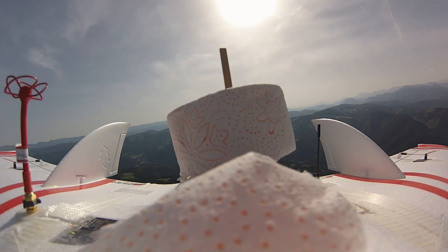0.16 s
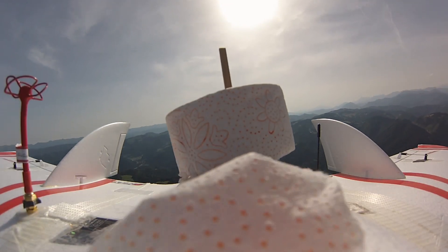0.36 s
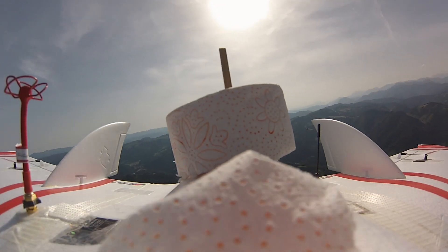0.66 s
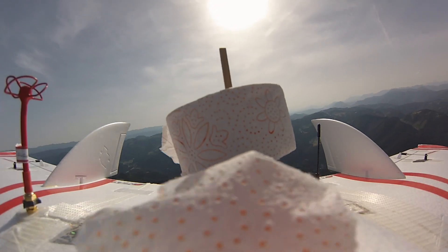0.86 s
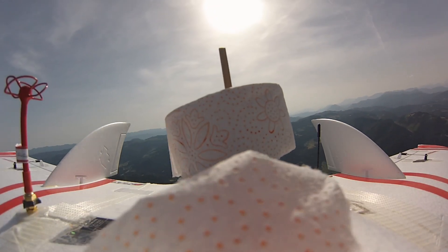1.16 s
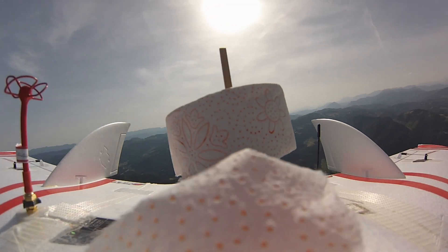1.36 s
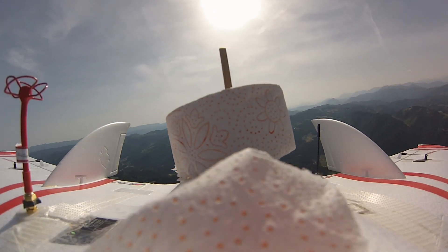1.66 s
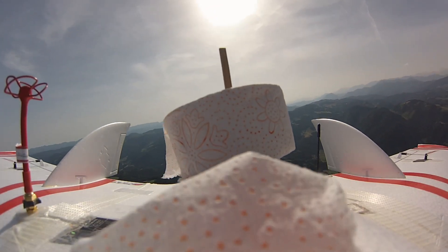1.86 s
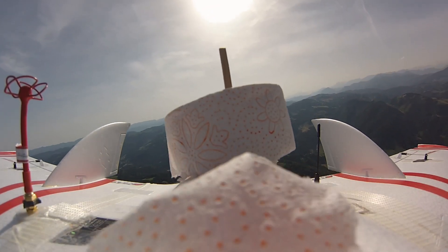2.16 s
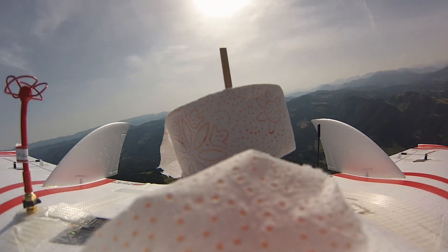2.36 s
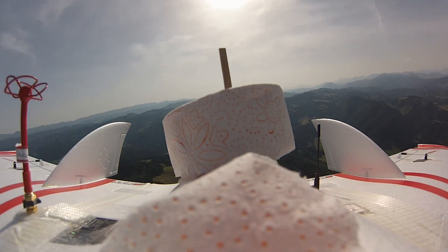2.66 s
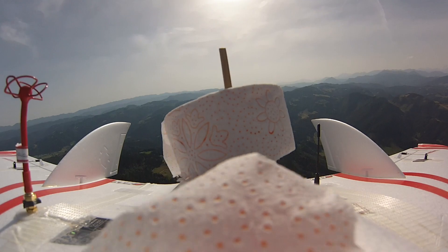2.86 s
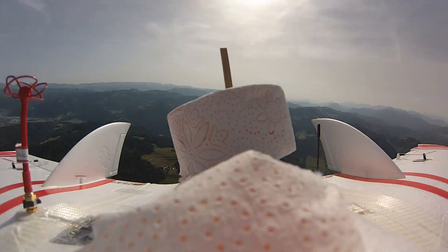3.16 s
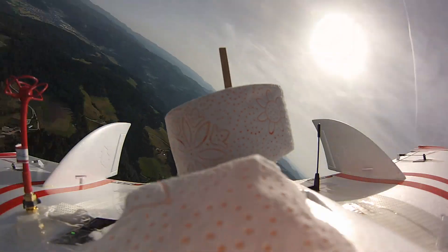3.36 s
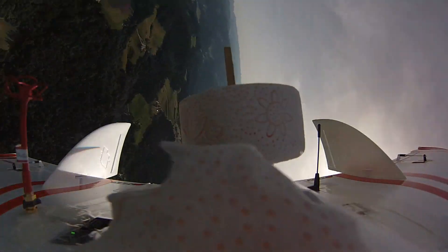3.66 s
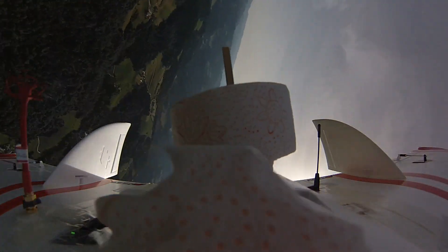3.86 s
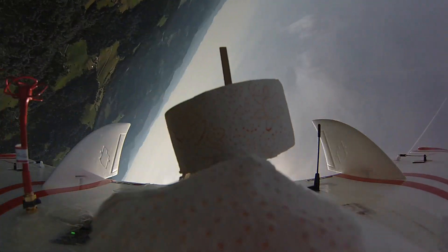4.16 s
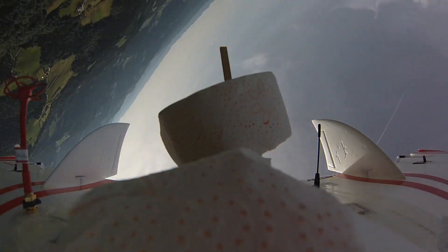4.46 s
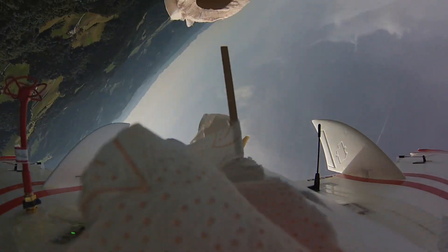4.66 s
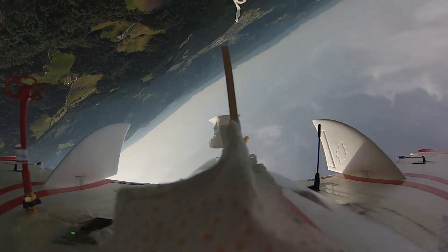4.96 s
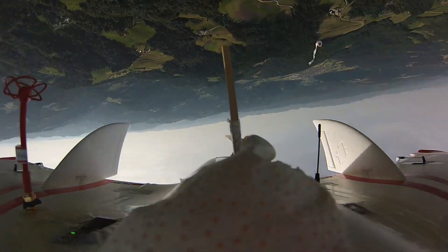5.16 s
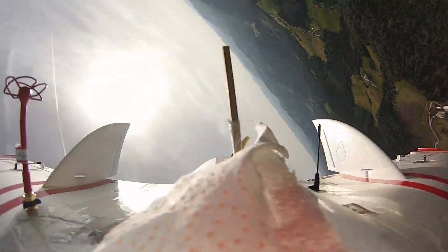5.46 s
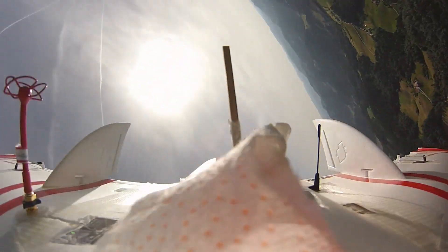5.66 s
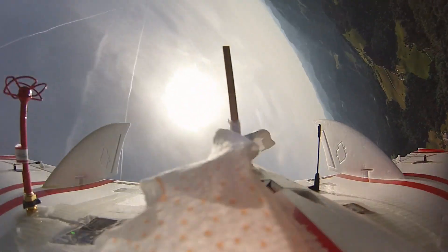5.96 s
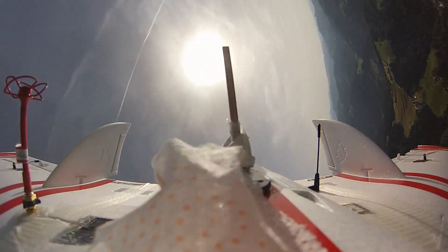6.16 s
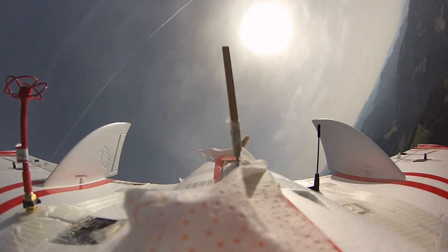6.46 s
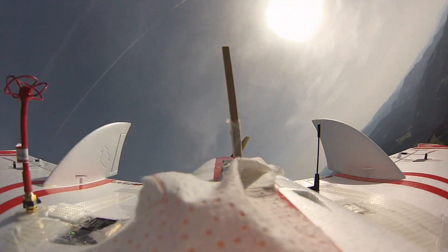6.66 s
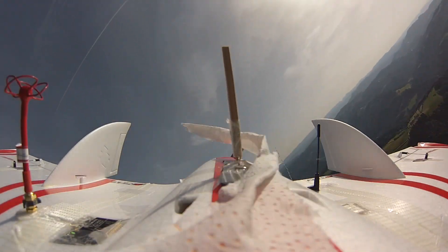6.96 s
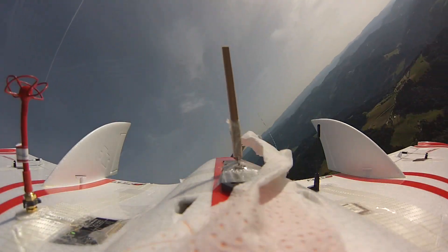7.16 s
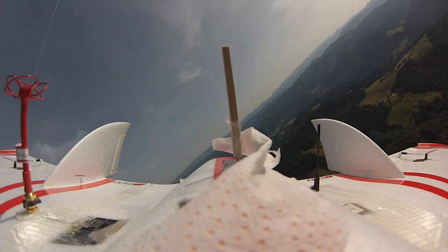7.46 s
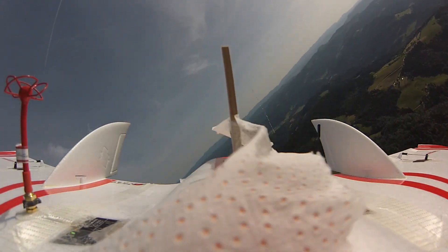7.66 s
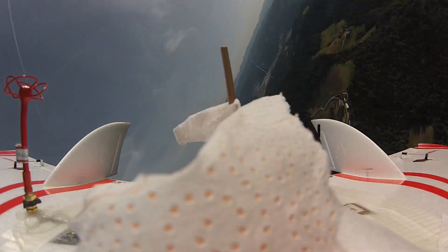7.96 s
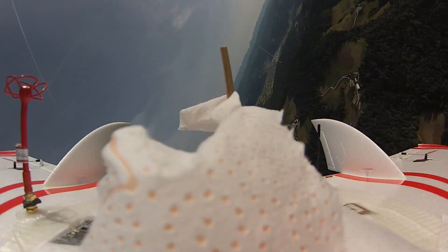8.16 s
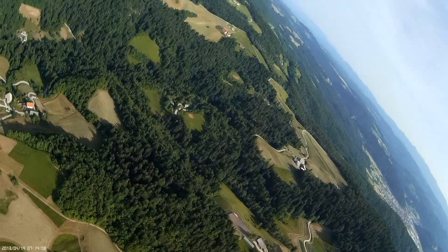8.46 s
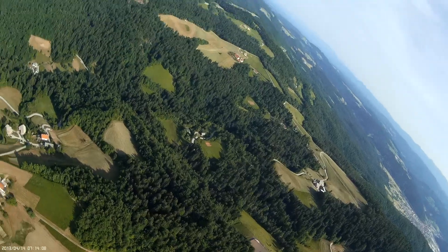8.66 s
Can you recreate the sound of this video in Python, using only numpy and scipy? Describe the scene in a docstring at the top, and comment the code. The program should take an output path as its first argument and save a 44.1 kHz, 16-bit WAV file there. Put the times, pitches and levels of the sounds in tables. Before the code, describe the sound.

A housed microphone rides the airframe outdoors: rumbling, gusty wind and a low two-blade motor drone. The drone turns coarser and louder under load, slides down and stops around the middle. A hollow knock and low wing shudders follow in thinner wind. Rushing air returns, paper rustles and crackles, then vibrates with a low reedy buzz. A hard cut brings a brighter, louder, saturated wind roar.

```python
"""On board a foam model plane in flight, microphone riding close on the airframe in a camera housing.
The two-blade propeller hums as a stack of shaft orders, is loaded in a roll and braked to a stop.
Bands of noise make the wind that buffets the housing; loose tissue paper buzzes as a wavering tone
and crackles as short noise bursts in the slipstream, and a paper roll knocks on the ringing fuselage.
Near the end the sound cuts to a second, bare microphone: broadband wind overloading its capsule."""
import sys
import numpy as np
from scipy import signal
from scipy.fft import rfft, irfft, next_fast_len
from scipy.io import wavfile
from scipy.ndimage import uniform_filter1d

SR = 44100
rng = np.random.default_rng(int(sys.argv[2]) if len(sys.argv) > 2 else 0)


def transcribe(u):
    """Save the signal u as a 16-bit wav file named by the first command-line argument.

    u: samples, shape (n,) or (channels, n), limited to [-1, 1]; the rate is SR.
    q: integer samples, one column per channel.
    """
    v = np.clip(np.atleast_2d(u).T, -1, 1)
    q = np.round(v * 32767).astype(np.int16)
    wavfile.write(sys.argv[1], SR, q)


N = 388521
TIME = np.arange(N) / SR
SIZE = next_fast_len(N)
BINS_HZ = np.maximum(np.arange(SIZE // 2 + 1) * SR / SIZE, 1)


def undb(db):
    """Amplitude of a level in dB."""
    return np.exp(np.asarray(db) * (np.log(10) / 20))


def unit(x):
    """Signal scaled to rms 1."""
    return x / np.sqrt(np.mean(x ** 2))


def columns(table):
    """Table columns as curves over time; the first column is the time in s."""
    s, *rest = np.transpose(table)
    return [np.interp(TIME, s, c) for c in rest]


def window(start_s, end_s, fade=0.018):
    """Gain 1 between two times, with short fades inside them."""
    return np.clip(np.minimum(TIME - start_s, end_s - TIME) / fade, 0, 1)


def walk(rate, size=N):
    """Random levels held about 1 / rate s and slewed twice; rms 1."""
    step = 16  # samples between coarse points
    hold = max(int(SR / step / rate), 2)
    held = np.repeat(rng.standard_normal(N // step // hold + 2), hold)
    coarse = uniform_filter1d(uniform_filter1d(held, hold), hold)
    return np.interp(np.arange(size), np.arange(len(coarse)) * step, unit(coarse))


def bell(offset, width):
    """Bell curve of height 1 that falls to 1/e at the width."""
    return np.exp(-(offset / width) ** 2)


def band(hz, width):
    """Gain of a bell-shaped band, for each frequency bin."""
    return bell(BINS_HZ - hz, width)


def read(spectrum, hz):
    """dB of a spectrum on a log-frequency axis."""
    f, db = np.transpose(spectrum)
    return np.interp(np.log(hz), np.log(f), db)


def noise(gain):
    """Steady noise of rms 1 with an amplitude gain for each frequency bin."""
    bins = rng.standard_normal(len(gain)) + 1j * rng.standard_normal(len(gain))
    return unit(irfft(gain * bins, SIZE)[:N])


def coloured(spectrum):
    """Steady noise of rms 1 with the given colour."""
    return noise(undb(read(spectrum, BINS_HZ)))


def tone(phase, db, waver_db=1.0, rate=25):
    """A sine of rms level about db whose strength wavers at random."""
    level_db = db + waver_db * walk(rate, size=len(phase))
    return np.sqrt(2) * undb(level_db) * np.sin(phase + rng.uniform(0, 2 * np.pi))


# mean shaft speed under power, then braking: time_s, shaft_hz
SHAFT_SPEED = [(0, 194), (1.25, 194), (1.33, 199.5), (1.4, 201), (1.55, 201.3), (1.63, 203.2),
               (1.75, 204.2), (1.9, 204.6), (2.09, 207.3), (2.3, 207.6), (3.0, 207.2), (3.19, 206.6),
               (3.24, 202.7), (3.42, 180.4), (3.49, 174.5), (3.66, 170.5), (3.7, 167.5), (3.76, 158),
               (3.85, 126.5), (4.0, 91.6), (4.046, 80.3), (4.08, 70), (4.11, 58.5), (4.17, 49)]
# flight state: time_s, state (0 climbing, 1 speeding up, 2 entering the roll, 3 blades loaded,
# 4 loaded hardest)
FLIGHT_STATE = [(1.27, 0), (1.6, 1), (3.17, 1), (3.32, 2), (3.45, 3), (3.66, 4)]
# motor levels, one row a flight state: imbalance_db, blade_tone_db, upper_orders_db
POWER_LEVELS = [(-28, -26.5, -50.5), (-30.5, -33.5, -53.5), (-27, -23, -57), (-27, -19.5, -49),
                (-26.5, -19, -46.5)]
# upper shaft orders relative to upper_orders_db, with half orders once the loaded blades flutter every
# second turn: multiple, then climbing_db, speeding_up_db, entering_roll_db, loaded_db, loaded_hardest_db
UPPER_ORDERS = [(3, 7, 1, 5, 0, 2), (3.5, -30, -30, -10, 1, -6), (4, 1, -3, 10, 6, 11),
                (4.5, -30, -30, 0, 6, 1), (5, 1, -3, 3, -4, 3), (6, -1, 2, 9, 7, 6),
                (6.5, -30, -30, -5, -4, -9), (7, 1, 2, 7, -3, -6), (7.5, -30, -30, -4, -5, -7),
                (8, -9, -4, -4, 2, 5), (8.5, -30, -30, -8, -6, -5), (9, -15, -16, -9, -2, -8),
                (10, -17, -9, -15, -10, -12), (11, -14, -20, -13, -15, -13), (12, -22, -24, -20, -11, -12),
                (14, -22, -21, -22, -18, -16), (21, -28, -20, -30, -45, -45), (42, -39, -39, -34, -38, -42)]
# panel modes that lift the orders passing through them: mode_hz, width_hz, lift_db
PANEL_MODES = [(2025, 40, 6), (7300, 380, 11)]
# how the airframe passes the shaft tones on: pitch_hz, gain_db
AIRFRAME_GAIN = [(45, -2), (58, -4), (72, 10.5), (95, 1.5), (130, -0.5), (700, -2.5), (790, 4), (900, 1.5),
                 (1150, 1), (1350, 8), (1500, -5), (1600, -10), (2200, -17)]
# shaft orders and whine heard while the propeller brakes, before that gain:
# multiple, then level_db at each handover time
BRAKING_ORDERS = [(5, -44, -51, -70, -70), (6, -50, -55, -70, -70), (9, -51, -62, -70, -70),
                  (10, -48, -58, -62, -62), (11, -48, -54, -62, -62), (12, -48, -56, -52, -51),
                  (13, -39, -40, -42, -41), (14, -41, -42, -39, -37), (15, -49, -46, -48, -61),
                  (16, -58, -54, -46, -58)]
HANDOVER_S = (3.8, 3.88, 3.96, 4.05)
# speed controller's switching tone, silent early in the braking, then faintly back: time_s, level_db
SWITCHING = [(0, -84), (3.76, -84), (3.79, -120), (3.98, -120), (4.0, -95), (4.28, -97), (4.31, -120)]
# difference tone of switching and commutation: time_s, level_db
DIFFERENCE_TONE = [(1.2, -92), (1.32, -71), (1.52, -77), (1.65, -66), (1.95, -65.5), (2.1, -69),
                   (3.17, -69), (3.32, -80), (3.45, -95)]
SWITCH_HZ, COMMUTATIONS = 12915, 42  # commutations a shaft turn
BLADE_HOLD_S, BLADE_FADE_DB_PER_S = 3.81, 273
BRAKE_S, STOP_S, MOTOR_OFF_S = 3.78, 4.16, 4.35


def motor():
    """Propeller and motor: sines at multiples of shaft speed under power and braking, controller tones."""
    n = int(MOTOR_OFF_S * SR)
    t = TIME[:n]
    tables = SHAFT_SPEED, FLIGHT_STATE, SWITCHING, DIFFERENCE_TONE
    shaft_hz, state, switch_db, difference_db = (columns(table)[0][:n] for table in tables)

    def by_state(db):
        return np.interp(state, range(len(POWER_LEVELS)), db)

    def panel_db(hz):
        return sum(db * bell(hz - mode_hz, width) for mode_hz, width, db in PANEL_MODES)

    imbalance_db, blade_db, upper_db = (by_state(db) for db in np.transpose(POWER_LEVELS))
    turn = 2 * np.pi * np.cumsum(shaft_hz * (1 + 0.0006 * walk(30, size=n))) / SR
    # the unloaded blades fall silent
    blade_db = blade_db - BLADE_FADE_DB_PER_S * np.maximum(t - BLADE_HOLD_S, 0)
    # the slowing shaft shakes the airframe as it crosses its low mode
    imbalance = tone(turn, imbalance_db + read(AIRFRAME_GAIN, shaft_hz))
    spinning = imbalance + tone(2 * turn, blade_db)

    driven = 0
    for k, *db in UPPER_ORDERS:
        order_db = upper_db + by_state(db) + panel_db(k * shaft_hz)
        driven = driven + tone(k * turn, order_db, waver_db=1.8, rate=35)
    # switching and commutation mix in the windings to a difference tone
    switch = 2 * np.pi * SWITCH_HZ * t
    driven += tone(switch - COMMUTATIONS * turn, difference_db, waver_db=2.5, rate=20)

    braking = 0
    for k, *db in BRAKING_ORDERS:
        order_db = np.interp(t, HANDOVER_S, db) + read(AIRFRAME_GAIN, k * shaft_hz)
        braking = braking + tone(k * turn, order_db, waver_db=2.0, rate=50)

    running = spinning * window(-1, STOP_S, fade=.04)[:n]
    running += driven * window(-1, BRAKE_S + 0.06, fade=0.1)[:n]
    running += braking * window(BRAKE_S - .04, STOP_S + .015, fade=.03)[:n]
    return np.pad(running + tone(switch, switch_db), (0, N - n))


# airflow over the housing, of which only the swing about the mean is used:
# time_s, buffet_db, roar_db, hiss_db
AIRFLOW = [(0, -25, -48, -58), (.8, -23, -50, -60.5), (1.05, -27.5, -51, -62), (1.55, -24, -49.5, -61.5),
           (1.75, -25, -49.5, -60), (2.4, -23, -50.5, -59.5), (3.15, -24.5, -48, -60),
           (3.5, -24.5, -50, -64), (3.85, -30, -49.5, -67.5), (3.94, -26.5, -54, -70),
           (4.02, -25, -50, -66), (4.15, -25, -49, -66.5), (4.4, -28, -63.5, -69.5), (4.55, -40, -65, -73),
           (4.7, -35, -66.5, -74.5), (4.83, -31.5, -65, -72.5), (4.9, -32, -60, -66.5),
           (4.96, -27.5, -57, -68), (5.08, -27.5, -56.5, -71), (5.16, -32, -61.5, -75.5),
           (5.4, -33, -65, -76.5), (5.57, -36, -67, -78), (5.71, -36, -63, -77.5),
           (6.03, -36.5, -64.5, -79), (6.1, -30, -60.5, -73), (6.24, -27.5, -50, -66.5),
           (6.4, -26.5, -54, -65), (6.8, -22, -49.5, -62), (7.25, -24.5, -48.5, -58.5),
           (7.8, -27, -51, -63), (8.33, -28, -53, -64.5)]
# short gusts and lulls in the airflow: centre_s, half_length_s, added_buffet_db, added_roar_and_hiss_db
GUSTS_AND_LULLS = [(0.633, 0.049, 3.5, 1), (2.318, .03, 2, -0.5), (5.012, 0.02, 1.5, 1),
                   (5.092, 0.011, -3, 6), (5.16, 0.013, 5, 1.5), (5.62, 0.017, 0, 5.5),
                   (6.162, 0.011, 1, 3), (6.186, 0.011, -1, -4), (6.21, 0.014, -0.5, 2),
                   (6.27, 0.032, 0, 1.5), (6.426, 0.012, 5, 4), (6.533, 0.0092, 3, 1.5),
                   (7.038, 0.02, 4.5, 0.5), (7.093, 0.012, 1.5, -1), (7.33, 0.02, 1.5, 1.5),
                   (7.44, 0.015, -0.5, 1.5), (8.085, 0.029, 5, -1.5), (8.208, 0.026, -0.5, 0),
                   (8.277, 0.025, -2, -2.5)]
# ranges of the airflow: centre_hz, mean_db, then shares 0-1 of the buffet, roar and hiss swings
AIR_RANGES = [(45, -34.5, .55, 0, 0), (200, -27, 1, 0, 0), (650, -35.5, .25, .55, 0),
              (2000, -54, 0, .85, .15), (3100, -58, 0, .3, .7), (7000, -65.5, 0, 0, 1)]


def airflow():
    """Level dB of each range over time, led by buffet, roar and hiss."""
    buffet, roar, hiss = (c - c.mean() for c in columns(AIRFLOW))
    for s, length, low_db, high_db in GUSTS_AND_LULLS:
        shape = bell(TIME - s, length)
        buffet, roar, hiss = buffet + low_db * shape, roar + high_db * shape, hiss + high_db * shape
    return np.array([db + low * buffet + mid * roar + high * hiss for _, db, low, mid, high in AIR_RANGES])


def between(curves, hz):
    """Curve at one frequency, interpolated between the airflow ranges."""
    place = np.interp(np.log(hz), np.log([r[0] for r in AIR_RANGES]), np.arange(len(AIR_RANGES)))
    k = min(int(place), len(AIR_RANGES) - 2)
    return curves[k] + (place - k) * (curves[k + 1] - curves[k])


# wind colour before a common trim: pitch_hz, level_db_per_hz
WIND_COLOUR = [(20, -7.5), (75, -5.5), (170, -6.5), (350, -11.5), (470, -16.5), (710, -25), (1380, -35.5),
               (1920, -43.5), (3000, -51), (5600, -58.5), (6600, -65), (8800, -69.5), (10800, -69.5),
               (12200, -85), (15000, -100)]
# loose paper flaps over the housing and chops the middle of the airflow: time_s, depth_db
PAPER_FLUTTER = [(4.3, 1), (4.7, 1), (8.3, 1.5)]


def turbulence(air):
    """Third-octave bands of wind noise: gusts shared by neighbours plus a flicker of their own."""
    swing = air - air.mean(axis=1, keepdims=True)
    low_gust, high_gust, flap = walk(5.4), walk(12), walk(40)
    flutter = columns(PAPER_FLUTTER)[0] * walk(35)
    out = 0
    for hz in 22 * 2 ** np.arange(0, 9.5, 1 / 3):
        treble = np.clip(np.log2(hz / 400) / 4.0, 0, 1)  # share of the quicker gusts
        shake = 0.83 * (1 - treble) * low_gust + treble * (0.43 * high_gust + 0.61 * flap)
        shake += 0.75 * walk(14)
        shake += bell(np.log2(hz / 1100), 1.3) * flutter
        db = read(WIND_COLOUR, hz) + 10 * np.log10(hz) - 49  # per Hz to per band, then the trim
        out = out + undb(db + between(swing, hz) + shake) * noise(band(hz, hz / 6))
    return out


# airframe modes that the buffeting rings: mode_hz, width_hz, level_db above the airflow there,
# added_db in the propeller wash
FRAME_MODES = [(207.7, 25, -11, -12.5), (479, 42, -8.5, 1.5), (1360, 110, -12.5, 5.5),
               (5140, 600, -10.5, 0.5), (7500, 670, -13, -5), (8750, 300, -21, -2.5)]
# propeller wash: time_s, share 0-1
PROPELLER_WASH = [(4.0, 1), (4.4, 0)]
# narrow noise bands that swell while the blades are loaded and slowing:
# centre_hz, width_hz, level_db at full swell
SWELLING_BANDS = [(788, 40, -48), (1350, 130, -50)]
# their swell: time_s, power share 0-1
BAND_SWELL = [(3.3, 0), (3.55, 0.92), (4.2, 0.7), (4.32, 0.03)]


def airframe(air):
    """Airframe modes as noise bands following the airflow, plus bands that swell with the loaded blades."""
    (wash,), (swell,) = columns(PROPELLER_WASH), columns(BAND_SWELL)
    out = 0
    for hz, width, db, wash_db in FRAME_MODES:
        level_db = db + wash * wash_db + between(air, hz) + 2.0 * walk(6.8)
        out = out + undb(level_db) * noise(band(hz, width))
    for hz, width, db in SWELLING_BANDS:
        out = out + undb(db + 2.0 * walk(20)) * np.sqrt(swell) * noise(band(hz, width))
    return out


# jolts of the wing in the stall: centre_s, peak_db, half_length_s
WING_JOLTS = [(4.75, -35, 0.098), (4.92, -27.5, 0.019), (5.119, -32, 0.043), (5.36, -32, 0.065),
              (5.95, -33, 0.052)]
WING_HZ, WING_WIDTH_HZ, WING_UNDER_BUFFET_DB = 84, 7, 12


def wing(air):
    """The wing's bending mode, shaken by the buffeting and harder by single jolts."""
    jolts = sum(undb(db) * bell(TIME - s, length) for s, db, length in WING_JOLTS)
    shaken = undb(air[1] - WING_UNDER_BUFFET_DB) + jolts
    return shaken * undb(0.81 * walk(7.6)) * noise(band(WING_HZ, WING_WIDTH_HZ))


# level of the taut paper edge in the stream: time_s, level_db
EDGE_LEVEL = [(7.17, -45), (7.21, -19), (7.42, -22), (7.5, -23.5), (7.63, -31), (7.73, -25.5), (7.79, -29),
              (7.84, -36), (7.88, -24.5), (7.94, -34), (8.0, -28.5), (8.06, -50)]
# pitch of that edge: time_s, pitch_hz
EDGE_PITCH = [(7.18, 266), (7.23, 274), (7.35, 281.4), (7.6, 280), (7.87, 270), (8.05, 280)]


def paper_buzz():
    """A taut paper edge buzzing in the stream: a gliding tone and its octave."""
    phase = 2 * np.pi * np.cumsum(columns(EDGE_PITCH)[0]) / SR
    strength = undb(columns(EDGE_LEVEL)[0]) * window(EDGE_LEVEL[0][0], EDGE_LEVEL[-1][0])
    return (tone(phase, 0, waver_db=1.3) + tone(2 * phase, -16, waver_db=2.0)) * strength


# brief edge whistles: start_s, length_s, pitch_hz, level_db
EDGE_WHISTLES = [(5.59, .22, 590, -46.5), (5.8, .24, 1050, -64)]


def paper_whistles():
    """The paper edge whistling briefly: faded tones of unsteady pitch."""
    out = 0
    for s, length, hz, db in EDGE_WHISTLES:
        phase = 2 * np.pi * hz * np.cumsum(1 + 0.013 * walk(30)) / SR
        out = out + tone(phase, db, waver_db=3.5) * window(s, s + length, fade=0.058)
    return out


# paper snaps and rustles, before the housing colours them: centre_s, peak_db, half_length_s
PAPER_SNAPS = [(.217, -45, .002), (.4622, -47, .001), (4.567, -61, .006), (4.685, -59, .003),
               (5.092, -60, .006), (5.229, -61, .006), (5.403, -61, .005), (5.472, -62, .004),
               (5.605, -56, .008), (5.78, -61, .01), (5.9008, -52, .0008), (6.078, -56, .004),
               (6.132, -59, .004), (6.203, -52, .004), (7.252, -46, .005), (7.442, -47, .005),
               (7.643, -48, .005), (7.883, -48, .005)]
# housing modes that colour them: mode_hz, width_hz, gain_db
SHELL_MODES = [(2900, 700, -6), (3900, 250, 0), (5200, 500, 0), (7300, 900, -13), (10000, 2500, -20)]


def paper_crackle(air):
    """Fine random clicks that follow the hiss of the airflow, and single snaps, through the housing."""
    crackle_db = 5.1 * np.minimum(rng.exponential(size=N), 2) + air[-1] + 5.5
    hits = (rng.random(N) < 40 / SR) * undb(crackle_db)  # about 40 a second
    tail = np.exp(-np.arange(SR // 25) / SR / .006)
    snaps = sum(undb(db) * bell(TIME - s, length) for s, db, length in PAPER_SNAPS)
    clicks = (signal.fftconvolve(hits, tail)[:N] + snaps) * rng.standard_normal(N)
    shell = sum(undb(db) * band(hz, width) for hz, width, db in SHELL_MODES)
    return irfft(rfft(clicks, SIZE) * shell, SIZE)[:N]


# the paper roll knocks on the fuselage: start_s, strength_db
ROLL_KNOCKS = [(4.658, -11.5), (5.082, -36), (6.259, -15)]
# fuselage ringing: mode_hz, width_hz, level_db relative to the knock
FUSELAGE_MODES = [(165, 18, 0), (205, 18, -3), (380, 25, -8), (720, 35, -19), (1250, 50, -17)]
# paper scuffing the foam with each knock: centre_hz, width_hz, level_db relative to the knock
FOAM_SCUFF = (1230, 200, -25)
SCUFF_DECAY_S = .012


def knocks():
    """Soft blows, each ringing the fuselage modes as decaying sines, with a scuff of noise."""
    blows = np.zeros(N)
    for s, db in ROLL_KNOCKS:
        blows[int(s * SR)] = undb(db)
    t = np.arange(SR // 5) / SR
    onset = 1 - bell(t, .012)
    ring = sum(undb(db) * np.exp(-np.pi * width * t) * np.sin(2 * np.pi * hz * t)
               for hz, width, db in FUSELAGE_MODES)
    hz, width, db = FOAM_SCUFF
    scuff_envelope = undb(db) * onset * np.exp(-t / SCUFF_DECAY_S)
    scuff = signal.fftconvolve(blows, scuff_envelope)[:N] * noise(band(hz, width))
    return signal.fftconvolve(blows, ring * onset)[:N] + scuff


# airflow colour on the bare microphone, relative: pitch_hz, level_db_per_hz
BARE_COLOUR = [(30, -6.5), (130, -4.5), (250, -7), (330, -5.5), (500, -1.5), (850, -6), (1000, -12),
               (3200, -17), (8600, -27.5), (12400, -37), (15000, -51)]
BARE_DB, CEILING_DB = -25, -20.5  # rms level before overload, capsule ceiling


def bare_microphone():
    """Dense broadband wind driven against the ceiling of a small capsule, which rounds its peaks."""
    flow = coloured(BARE_COLOUR) * undb(BARE_DB + 0.42 * walk(15))
    x, knee = flow / undb(CEILING_DB), 5.0
    return flow / (1 + np.abs(x) ** knee) ** (1 / knee)


# self-noise colour of the housed microphone, relative: pitch_hz, level_db_per_hz
SELF_COLOUR = [(1000, 1), (5500, -8.5), (6700, -7.5), (9000, -13), (12500, -19), (13200, -26.5)]
SELF_DB = -79.5


def self_noise():
    """Steady, faint hiss of the housed microphone."""
    return undb(SELF_DB) * coloured(SELF_COLOUR)


CUT_S = 8.3375


def scene():
    """The housed microphone on the airframe, then a hard cut to the bare one."""
    air = airflow()
    wind = turbulence(air) + airframe(air) + wing(air)
    paper = paper_buzz() + paper_whistles() + paper_crackle(air)
    housed = motor() + wind + paper + knocks() + self_noise()
    return np.where(TIME < CUT_S, housed, bare_microphone())[None]


TOP_HZ, FADE_IN_S = 14900, .004


def record(dry):
    """The recorder opens softly and cuts the top with a steep low-pass."""
    low_pass = signal.ellip(10, .2, 70, TOP_HZ, fs=SR, output="sos")
    return signal.sosfilt(low_pass, dry * window(0, 9, fade=FADE_IN_S))


dry = scene()
out = record(dry)
transcribe(out)
```